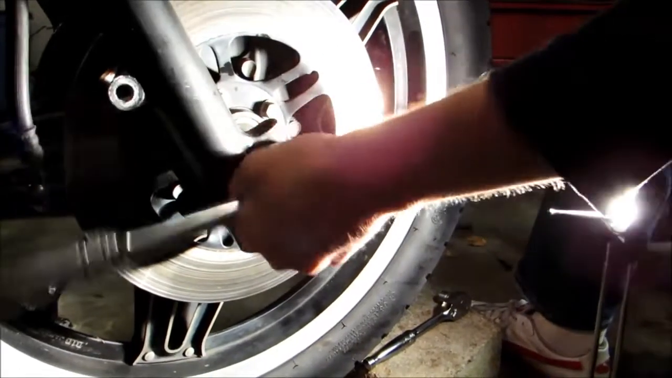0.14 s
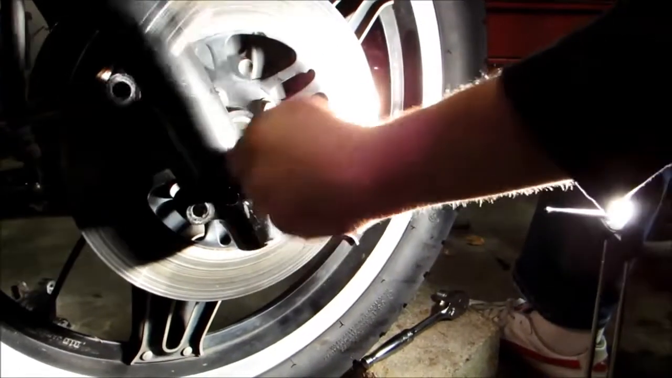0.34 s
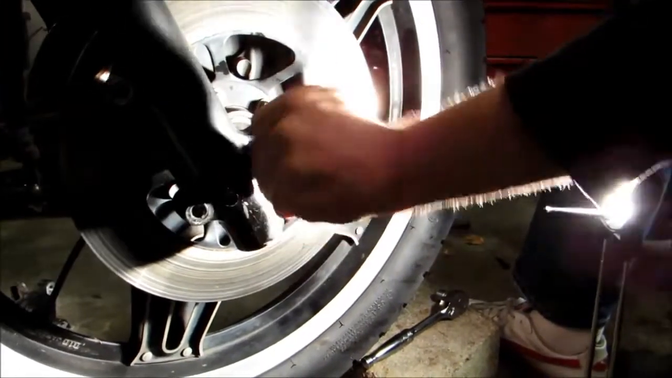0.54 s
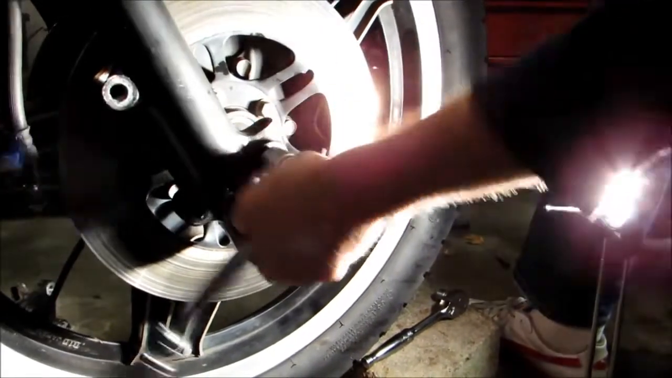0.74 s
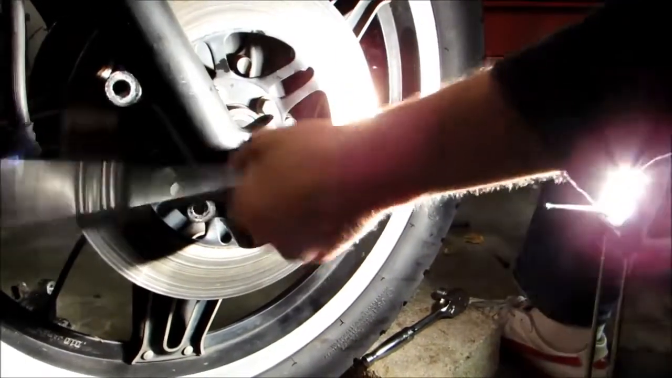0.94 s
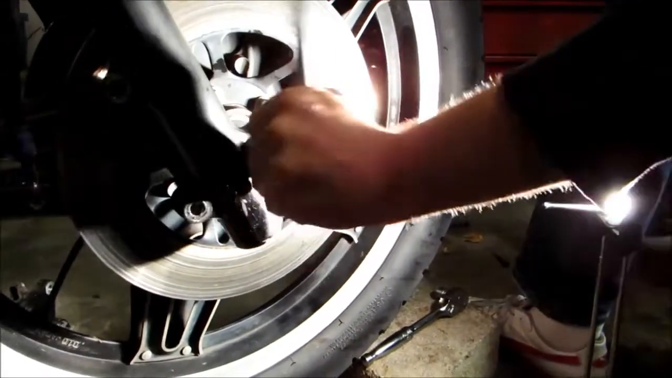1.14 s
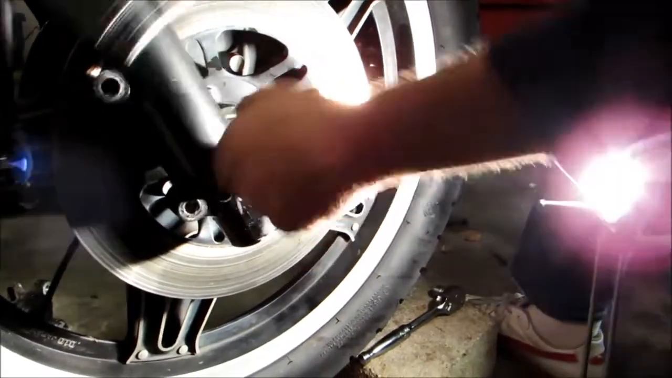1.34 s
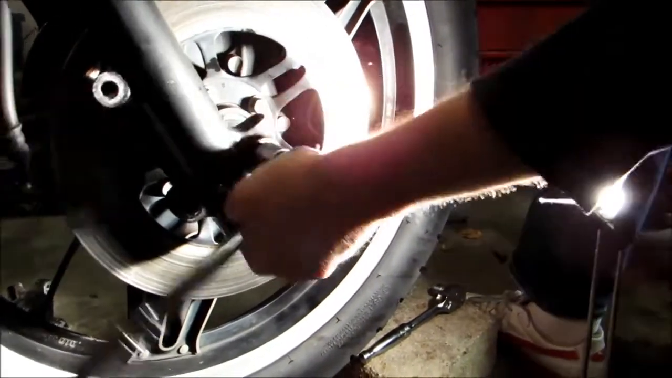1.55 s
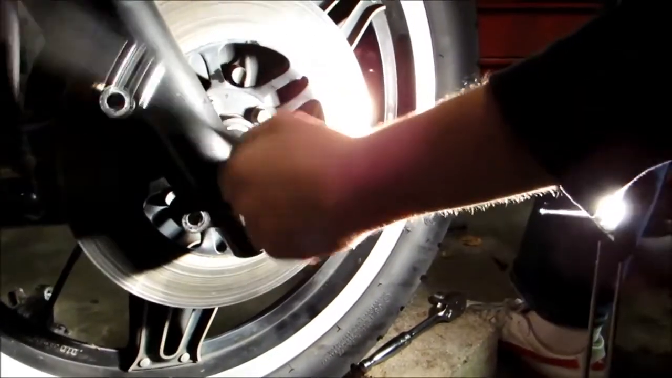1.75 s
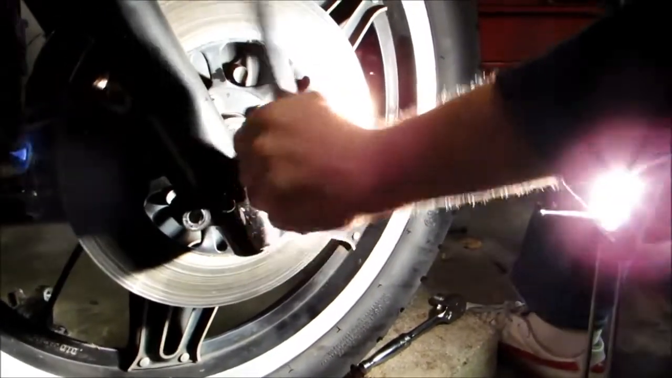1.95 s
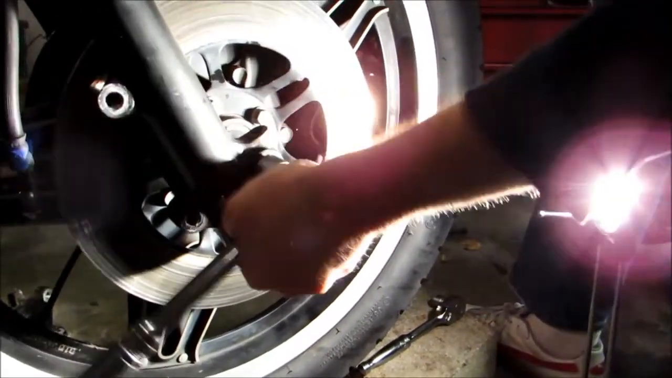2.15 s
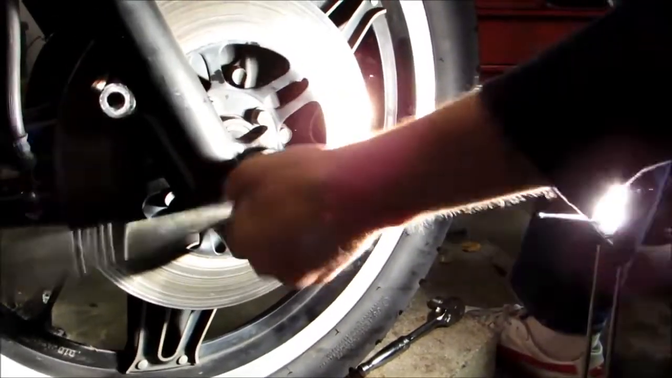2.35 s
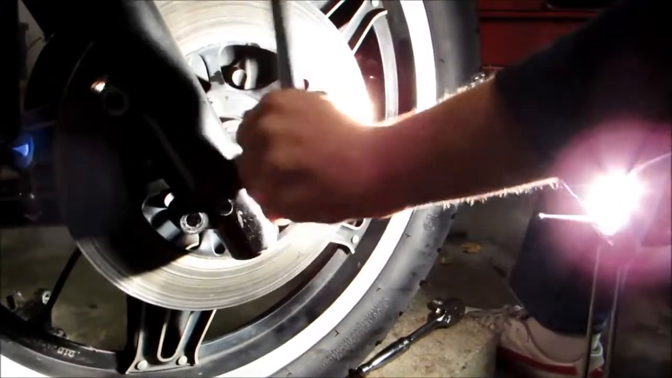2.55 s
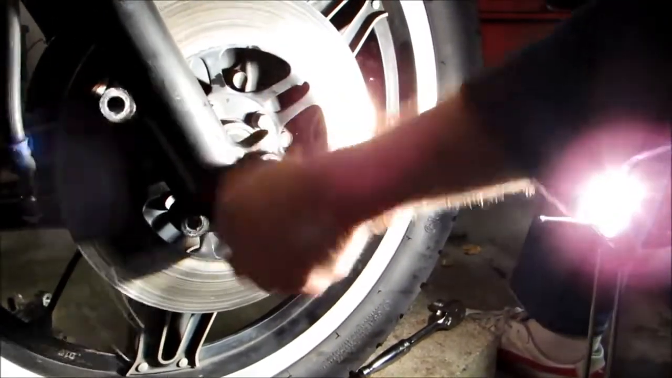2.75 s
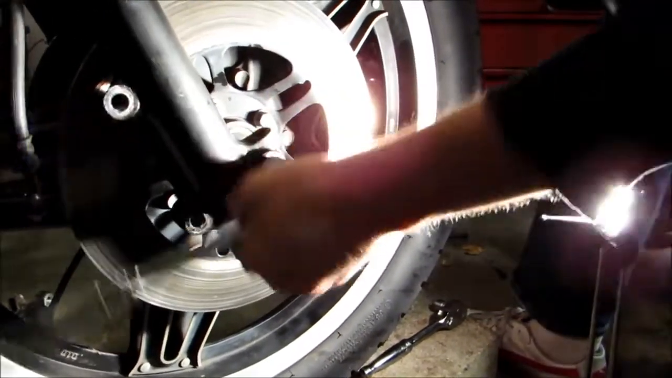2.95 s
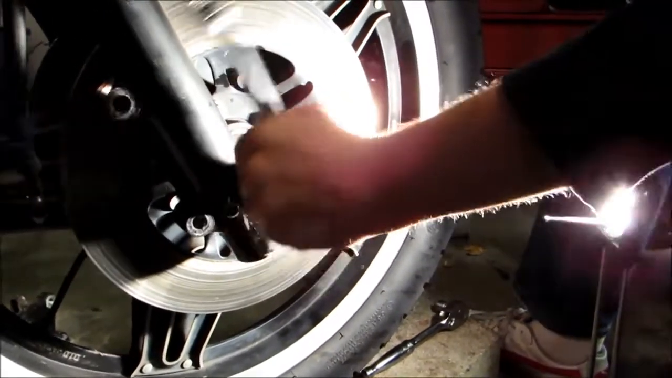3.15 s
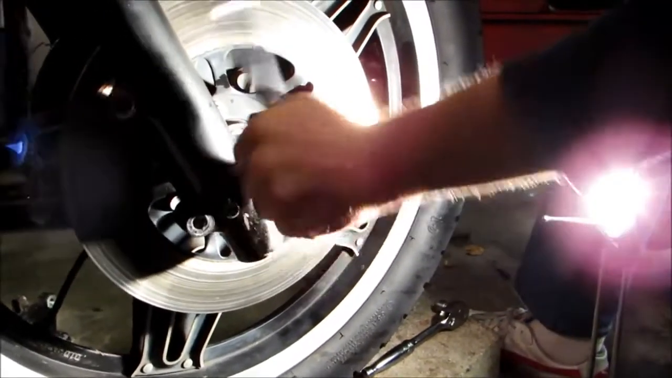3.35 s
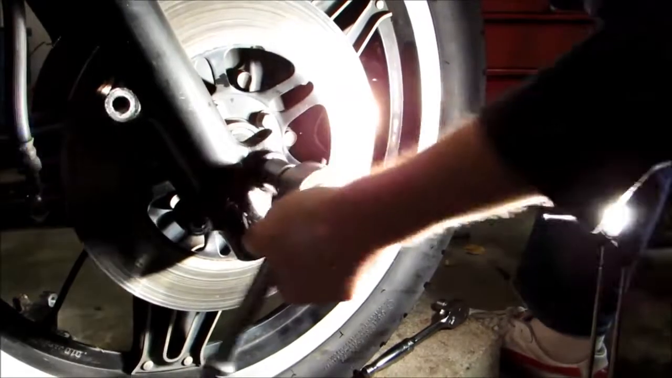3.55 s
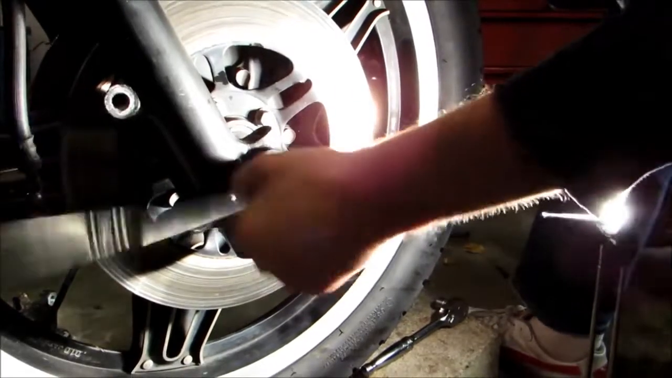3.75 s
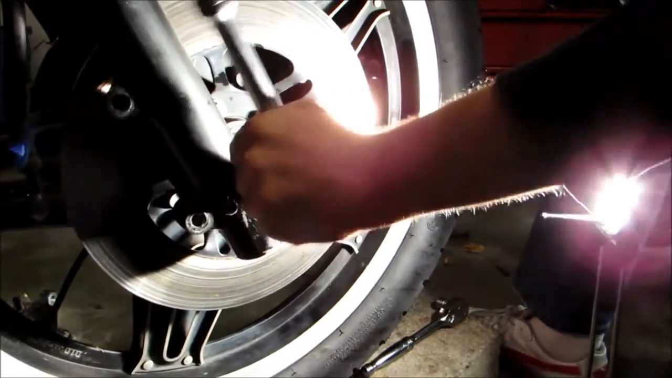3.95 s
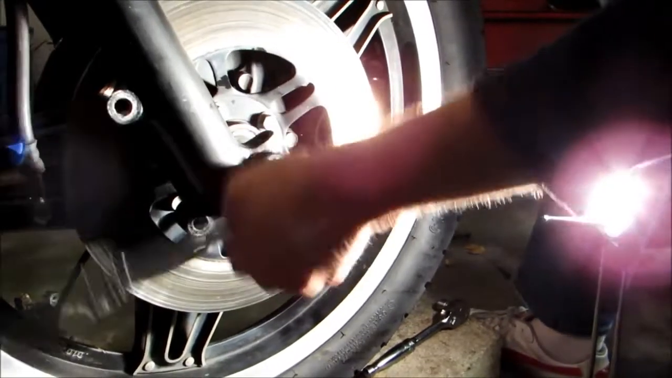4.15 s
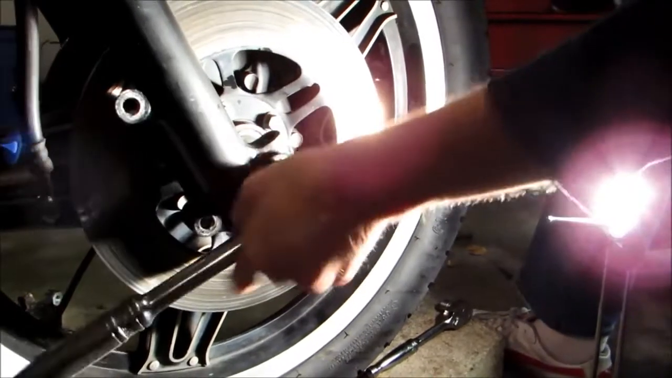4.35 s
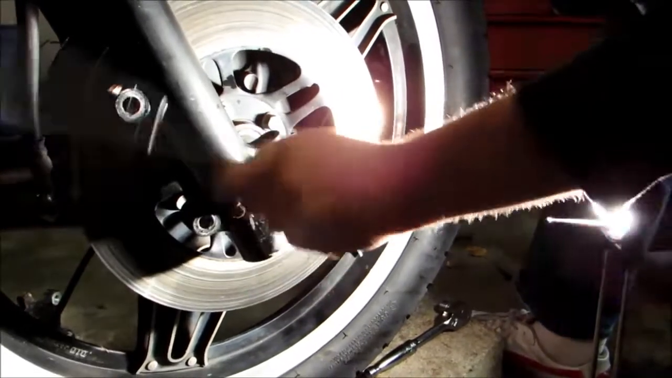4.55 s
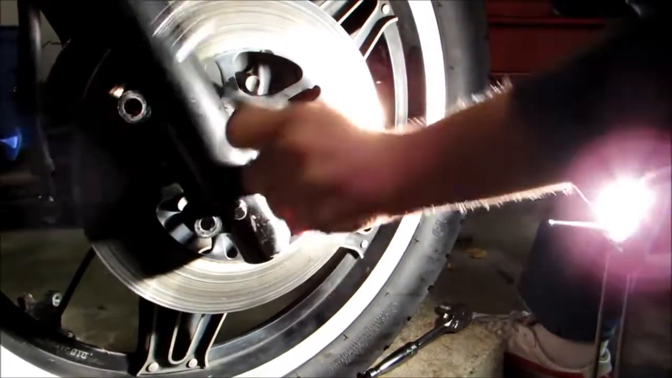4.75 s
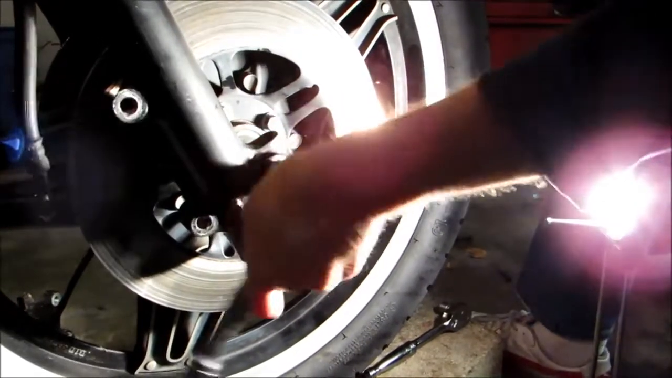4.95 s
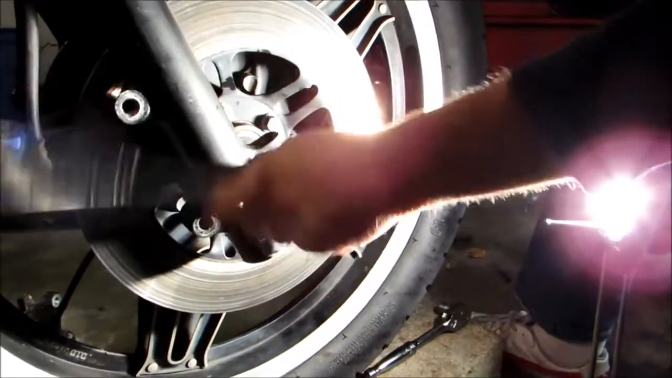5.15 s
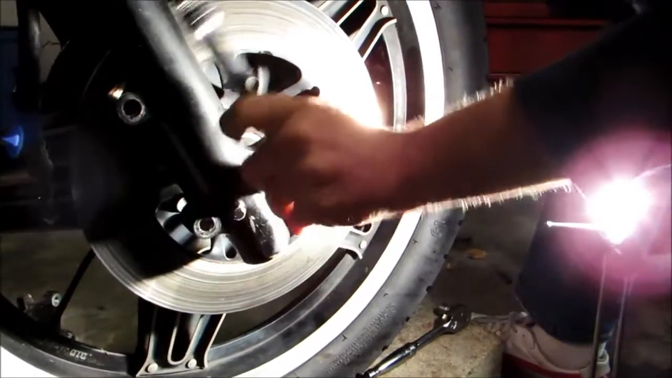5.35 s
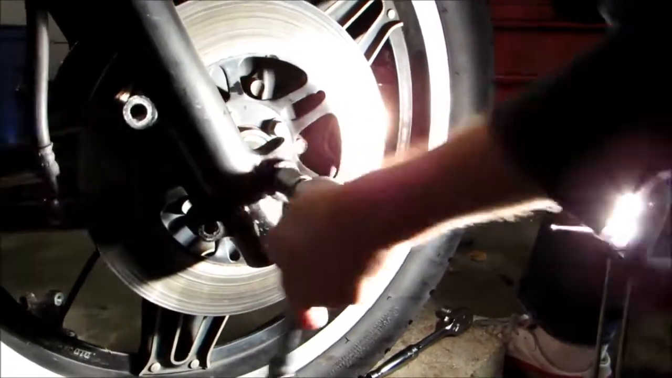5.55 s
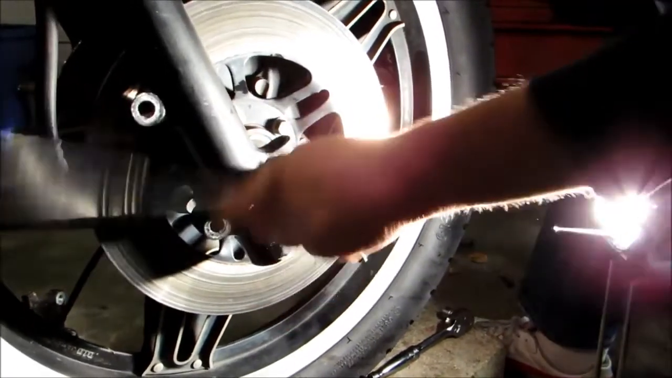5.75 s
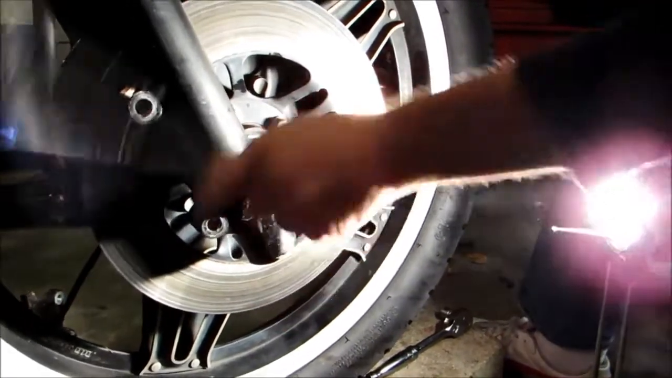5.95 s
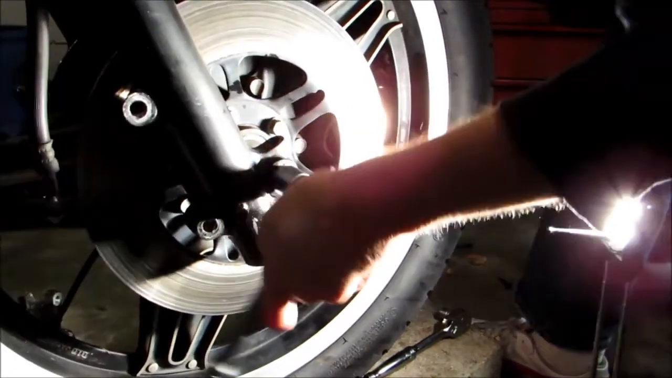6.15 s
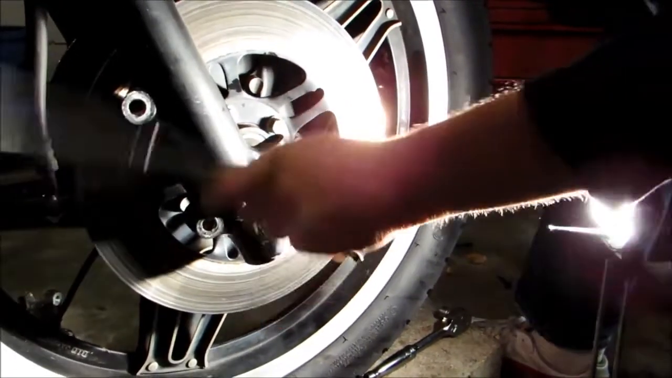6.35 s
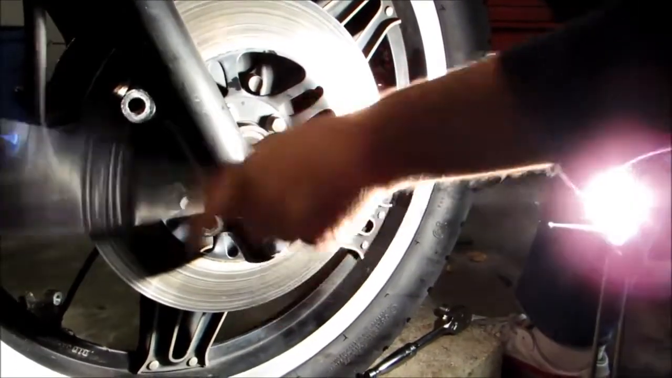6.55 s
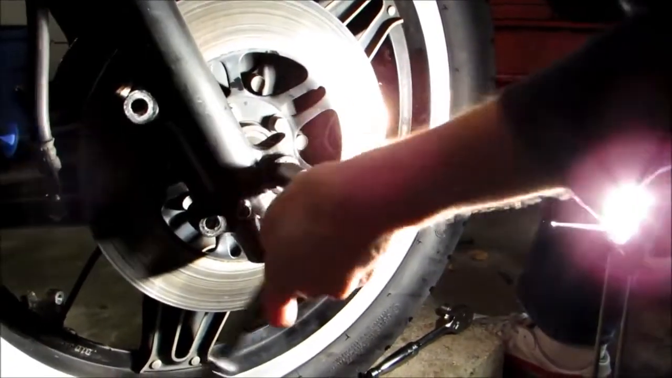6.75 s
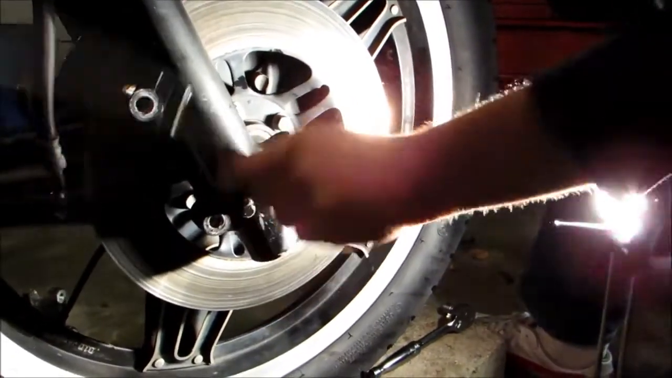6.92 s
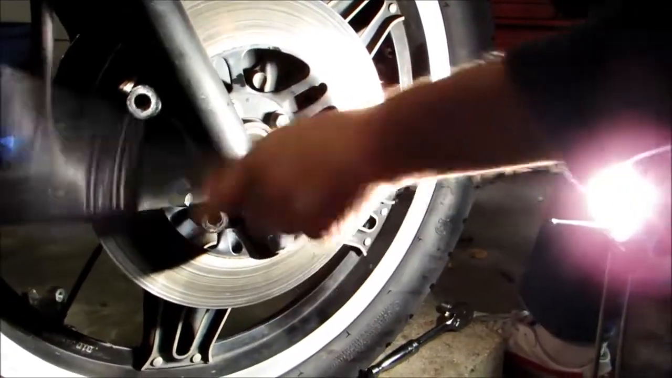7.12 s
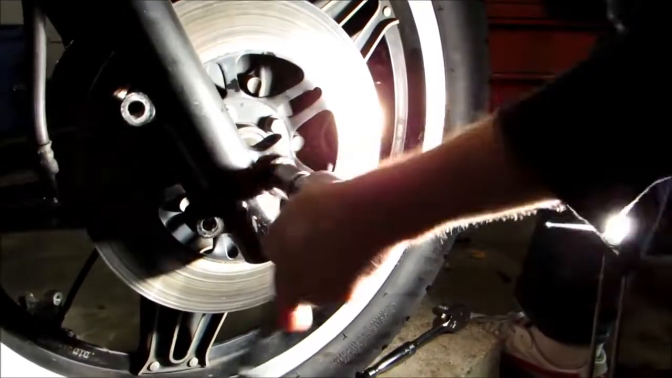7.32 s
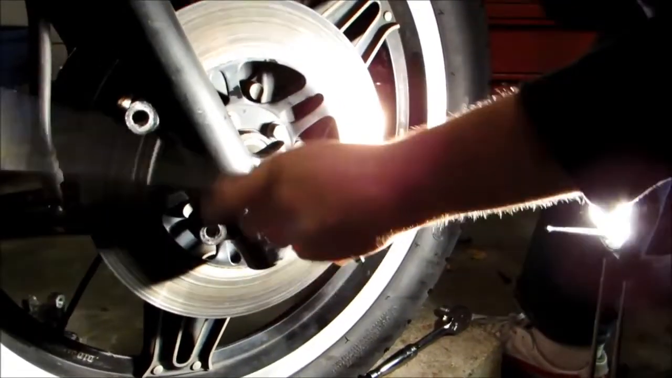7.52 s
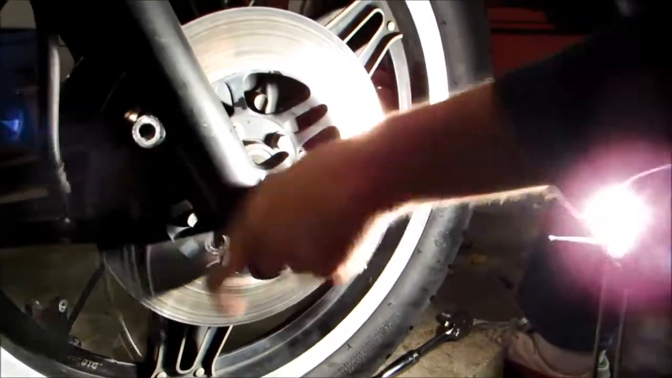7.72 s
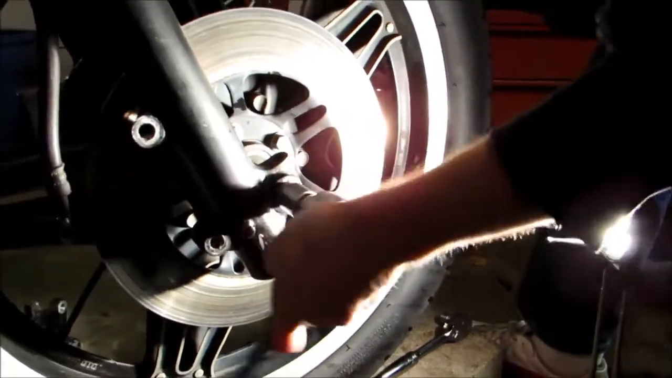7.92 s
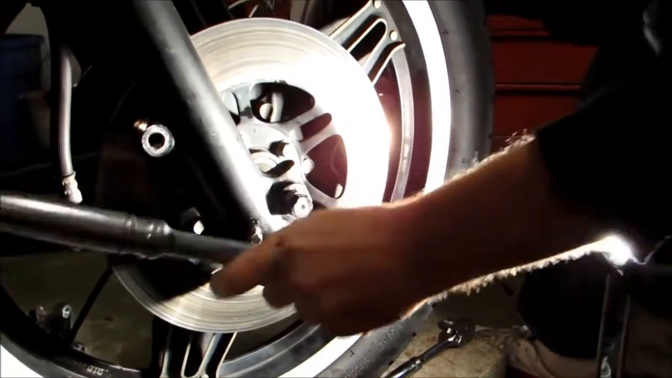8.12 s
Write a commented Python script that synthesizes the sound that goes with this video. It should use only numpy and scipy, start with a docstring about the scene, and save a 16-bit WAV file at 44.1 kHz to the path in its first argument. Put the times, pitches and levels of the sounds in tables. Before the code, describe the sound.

A socket ratchet clicks in thirteen quick bursts, with small metallic clacks between strokes, close up in a small, lively garage.

```python
"""A socket ratchet backs a bolt out of a motorcycle's front fork, close by in a small garage, for about 8 s.
The handle first knocks loosely, then the pawl (the sprung catch) snaps over the teeth in thirteen return swings.
Between swings the socket takes up its slack and clacks; from 1.7 s on, a few hollow bumps sound as well.
Toward the end the bolt rattles more. Blows are shaped noise, bumps are fading sine waves;
echoes and reverberation answer them, and a quiet rush of noise fills the room throughout."""
import sys
import numpy as np
from scipy import signal
from scipy.fft import rfft, irfft, next_fast_len
from scipy.io import wavfile
from scipy.ndimage import map_coordinates

SR = 44100
rng = np.random.default_rng(int(sys.argv[2]) if len(sys.argv) > 2 else 0)


def log_audio(samples):
    """Write samples as a 16-bit WAV file to the path given in sys.argv[1]."""
    # one column per channel
    frames = np.atleast_2d(samples).T
    # limit to full scale, then quantise
    limited = np.clip(frames, -1, 1)
    pcm = np.round(limited * 32767).astype(np.int16)
    wavfile.write(sys.argv[1], SR, pcm)


N = 365148  # length of the scene in samples
SIZE = 4096  # length of one blow in samples
T, HZ = np.arange(SIZE) / SR, np.fft.rfftfreq(SIZE, 1 / SR)


# Return swings of the handle. Each row: first tooth in seconds, last tooth in seconds, count of teeth,
# first gap and last gap as multiples of the gap at full speed, relative level at the start, in mid-swing
# and at the end in dB, brightness in dB, ring of the steel head in dB, ring at the end in dB,
# middle pitch of the snap in Hz.
RETURN_SWINGS = [(0.2856, 0.5010, 9, 1.39, 1.26, -15.5, -18.5, -16.5, 0, -2.5, -20, 3040),
                 (0.9458, 1.2473, 11, 1.6, 1.53, -17, -20, -21, 0, -6, -5, 2880),
                 (1.6649, 1.9306, 9, 1.2, 1.58, -20, -19.5, -19.5, 1, 1.5, 0, 3080),
                 (2.3929, 2.5842, 9, 1.44, 1.42, -18.5, -20, -18.5, -1, 1.5, -19, 3220),
                 (2.9847, 3.2740, 10, 1.51, 1.61, -20, -19, -22, 2, 3, -10, 3250),
                 (3.722, 3.9870, 9, 1.3, 1.5, -21, -19, -18, 1, 2, -3.5, 3090),
                 (4.5485, 4.699, 7, 1.02, 1.67, -16, -18.5, -19, 1, 7.5, -11, 3000),
                 (5.1501, 5.3342, 9, 1.18, 1.54, -17.5, -22, -17, 1.5, 5, 9, 2820),
                 (5.691, 5.9084, 11, 1.32, 1.52, -18.5, -21.5, -18.5, 2, 5.5, 0, 3030),
                 (6.2670, 6.4602, 9, 1.59, 1.68, -19.5, -19.5, -19.5, -1, 5, -2, 2500),
                 (6.861, 7.0706, 10, 1.67, 2.35, -18.5, -22, -19, 0, 4.5, 15, 2830),
                 (7.4163, 7.6180, 10, 1.38, 1.48, -20, -21, -20.5, 1, -7, 0.5, 2430),
                 (7.9868, 8.0987, 5, 1.19, 1.08, -17, -21, -26.5, 1, 3.5, 0, 3150)]


def teeth():
    """The handle gathers and loses speed near the ends of each swing, which sets the time of every tooth."""
    ease = 5  # a high power keeps the speed change within a tooth or two of each end
    first_db, first_bright_db, first_ring_db = 0.2, -2, -1.5  # the first tooth breaks free harder and duller
    pitch_rise_octaves = 0.081  # the snap rises over a swing
    # random differences from tooth to tooth
    scatter_db, bright_scatter_db, ring_scatter_db, pitch_scatter_octaves = 1.0, 2, 8, 0.16
    rows = []
    for (start, end, count, first_gap, last_gap, start_db, middle_db, end_db,
         bright_db, ring_db, end_ring_db, hz) in RETURN_SWINGS:
        count = round(count)
        step, place = np.linspace(0, 1, count - 1), np.linspace(-1, 1, count)
        gaps = 1 + (first_gap - 1) * (1 - step) ** ease + (last_gap - 1) * step ** ease
        times = start + (end - start) * np.r_[0, np.cumsum(gaps)] / gaps.sum()

        first = np.arange(count) == 0
        early, late = np.minimum(place, 0) ** 2, np.maximum(place, 0) ** 2
        size, colour, ring_change, pitch_change = rng.standard_normal((count, 4)).T
        level = middle_db + early * (start_db - middle_db) + late * (end_db - middle_db)
        level = level + first_db * first + scatter_db * size
        bright = bright_db + first_bright_db * first + bright_scatter_db * colour
        ring = ring_db + late * (end_ring_db - ring_db)
        ring = ring + first_ring_db * first + ring_scatter_db * ring_change
        pitch = hz * 2 ** (pitch_rise_octaves * place / 2 + pitch_scatter_octaves * pitch_change)
        rows += zip(times, level, bright, ring, pitch)
    return rows


# Tone colour of the snap, before the resonances. Each row: frequency in Hz, relative level in dB per Hz.
SNAP_COLOUR = [(500, -27.5), (800, -19.5), (1150, -8), (1400, -8), (1850, -3.5), (2300, -2), (3000, 0.5),
               (3550, -0.5), (4300, -1.5), (5500, -3.5), (7000, -3.5), (9000, -1.5), (11500, -4),
               (14000, -4)]
# Ringing modes of the steel head. Each row: frequency in Hz, width in Hz, relative level in dB.
HEAD_MODES = [(1140, 49, -13), (1613, 96, 7), (2820, 81, -0.5), (5080, 320, 0.5), (6044, 260, 12.5),
              (9000, 180, 1.5)]
# How far the hand slips back and frees the head. Each row: time in seconds, relative ring in dB.
HAND_GRIP = [(0, -13), (4.1, -16), (4.6, -11), (7, -9), (7.6, 2), (8.28, -11)]
# How alike left and right are for sounds of the tool. Each row: frequency in Hz, likeness (1 = the same).
TOOL_ALIKE = [(300, 0.15), (900, 1), (2500, 0.77), (5000, 0.66), (6100, 0.56), (7500, 0.34), (9500, 0.71),
              (11500, 0.13), (14000, 0.11)]


def pawl(drops):
    """Each tooth: a bouncing crack and a snap that rings the head, which sings on where the hand leaves it free."""
    level_db, ring_db, crack_db, sing_db = -1.0, -1, -4, -17
    pitch_db, pitch_width_hz = 6.0, 380  # the pawl's own resonance
    sing_hz, sing_width_hz = 5960, 260
    track = np.zeros((2, N))
    modes = sum(amp(db) ** 2 * peak(hz, width) for hz, width, db in HEAD_MODES)
    bright_tilt = along([(1500, -0.83), (3500, -0.11), (8000, 0.33)], HZ)
    # mainly the treble follows the single contacts
    crack_tilt_db = along([(1500, -17.0), (4000, -8), (8000, 4.0)], HZ)
    sing_colour = 20 * np.log10(peak(sing_hz, sing_width_hz))
    for s, db, bright_db, head_db, pitch in drops:
        # the pawl's own resonance differs in pitch from tooth to tooth, partly at random
        own = amp(pitch_db) ** 2 * peak(pitch, pitch_width_hz)
        ringing = 1 + modes * amp(ring_db + head_db) ** 2 + own
        plain = along(SNAP_COLOUR, HZ) + bright_db * bright_tilt

        snap_touch = contact(rise=0.0001, chatter=0.0012, t60=0.026)
        snap = burst(snap_touch, plain + 10 * np.log10(ringing), TOOL_ALIKE)
        crack = burst(bounces(t60=.006), plain + crack_tilt_db, TOOL_ALIKE)
        sing = burst(contact(rise=0.00089, chatter=.002, t60=0.059), sing_colour, TOOL_ALIKE)

        free_db = np.interp(s, *np.transpose(HAND_GRIP))
        blow = snap + amp(crack_db + 0.51 * bright_db) * crack + amp(sing_db + free_db) * sing
        add(track, s, amp(db + level_db) * blow)
    return track


def bounces(t60):
    """The sprung pawl lands and rebounds at uneven gaps, each contact weaker than the last on average."""
    count, spacing, loss_db, scatter_db = 3, 0.001, -3.0, 3  # spacing in seconds
    gaps = spacing * rng.uniform(.4, 1.6, count - 1)
    age = T - np.r_[0, np.cumsum(gaps)][:, None]
    size_db = loss_db * np.arange(count) + scatter_db * rng.standard_normal(count)
    contacts = (age >= 0) * amp(size_db[:, None] - 60 * np.abs(age) / t60) ** 2
    return np.sqrt(np.sum(contacts, 0))


# The bolt works loose. Each row: time in seconds, relative level of its rattle in dB.
BOLT_PLAY = [(0, -9), (1.8, -10), (3.2, -8.5), (4.6, -4), (5.3, -14), (6.3, -4), (7, -2.5), (7.5, -0.5),
             (8.28, 3.5)]
# Tone colour of the bolt's rattle. Each row: frequency in Hz, relative level in dB per Hz.
BOLT_COLOUR = [(300, -21), (600, -5.5), (950, 1.5), (1250, 1), (1600, -7), (2400, -3), (5000, -44)]
# Tone colour of the fork's dull knock. Each row: frequency in Hz, relative level in dB per Hz.
FORK_COLOUR = [(50, -26.5), (100, -11), (160, 2.5), (230, -3), (310, 7.5), (420, -8.5), (700, -4.5),
               (1200, -8), (3000, -49.5)]
# How alike left and right are for the fork and the reverberation. Each row: frequency in Hz,
# likeness (1 = the same, negative = opposed).
WIDE_ALIKE = [(100, -0.083), (300, -0.31), (900, 0.7), (3000, 0.89), (6000, 0.91), (9000, -0.14),
              (14000, -0.2)]


def drive(drops):
    """The pawl scrapes up each flank, louder in a fast swing; its drop shakes the bolt and the fork."""
    slide_db, rattle_db, knock_db = -20, -19, -22
    usual_gap, longest_gap, lead = 0.035, 0.07, .008  # seconds; the scrape starts ahead of the drop
    track = np.zeros((2, N))
    times, levels = np.transpose(drops)[:2]
    speeds = usual_gap / np.minimum(np.diff(times, prepend=0), longest_gap)
    for s, db, speed in zip(times, levels, speeds):
        slide = burst(contact(rise=0.018, chatter=lead, t60=0.0043), along(SNAP_COLOUR, HZ), TOOL_ALIKE)
        rattle = burst(contact(rise=0.0025, chatter=0.0032, t60=0.053), along(BOLT_COLOUR, HZ), TOOL_ALIKE)
        knock = burst(contact(rise=0.00063, chatter=0.0018, t60=0.092), along(FORK_COLOUR, HZ), WIDE_ALIKE)
        loose_db = np.interp(s, *np.transpose(BOLT_PLAY))
        shake = amp(rattle_db + loose_db) * speed * rattle + amp(knock_db) * knock
        add(track, s - lead, amp(db + slide_db) * speed * slide)
        add(track, s, amp(db) * shake)
    return track


# The play in the socket closes as the handle turns round. Each row: time in seconds,
# relative level of the clack in dB, relative level of the fork's knock in dB.
HANDLE_TURNS = [(0.143, -43, -37), (0.613, -17.5, -25), (0.874, -46, -36.5), (1.3374, -23.5, -36.5),
                (2.0541, -16.5, -33.5), (2.298, -29.5, -32.5), (2.6804, -21, -28.5), (2.862, -37, -38),
                (3.354, -26.5, -37), (3.4056, -18, -33), (3.627, -35.5, -37), (4.05, -24.5, -27.5),
                (4.0708, -15, -40), (4.1029, -20, -31.5), (4.4969, -28, -29), (4.808, -22.5, -31.5),
                (5.087, -32, -35), (5.4186, -21, -38), (5.996, -19.5, -34), (6.566, -22, -33.5),
                (6.8, -37, -36), (7.06, -45, -36), (7.126, -30, -37.5), (7.689, -35, -32.5),
                (7.7257, -20, -33.5), (7.932, -42, -44)]
# Tone colour of the clack. Each row: frequency in Hz, relative level in dB per Hz.
CLACK_COLOUR = [(500, -9.5), (1000, -8), (1600, 2), (2100, 3.5), (3100, 4.5), (3900, -4), (5000, -5.5),
                (6000, -2), (7000, -9), (9200, -8), (14000, -17)]


def socket():
    """The socket clacks against the bolt head; a gentle contact is duller and lasts longer."""
    level_db, usual_treble_db, stretch = -8, -10, 0.2
    # below a firm clack the treble falls faster than the level, down to a limit
    firm_db, treble_per_db, dullest_db = -16, 2.4, -34
    track = np.zeros((2, N))
    tilt = along([(1200, 0), (1700, 0.0), (3000, 0.41), (7000, 1.0)], HZ)
    for s, db, _ in HANDLE_TURNS:
        treble_db = max(treble_per_db * (db - firm_db), dullest_db)
        hard_db = treble_db - usual_treble_db
        slow = amp(-stretch * hard_db)
        touch = contact(rise=0.00027 * slow, chatter=0.00098 * slow, t60=0.029)
        clack = burst(touch, along(CLACK_COLOUR, HZ) + hard_db * tilt, TOOL_ALIKE)
        add(track, s, amp(db + level_db) * clack)
    return track


def fork():
    """The heavy fork and wheel answer a change of load with a short, dull knock."""
    level_db = -3
    track = np.zeros((2, N))
    for s, _, db in HANDLE_TURNS:
        knock = burst(contact(rise=0.0015, chatter=0.0077, t60=0.1), along(FORK_COLOUR, HZ), WIDE_ALIKE)
        add(track, s, amp(db + level_db) * knock)
    return track


# Hollow bumps. Each row: time in seconds, relative level in dB, base pitch in Hz,
# base time to fade by 60 dB in seconds.
HOLLOW_BUMPS = [(1.724, -21.5, 304, 0.13), (5.104, -35, 160, 0.12), (5.182, -21, 470, 0.035),
                (5.6338, -23, 312, 0.12), (7.147, -33, 186, 0.06), (7.154, -34, 277, 0.076)]
# Partial tones of each bump. Each row: multiple of the base pitch, relative level in dB,
# share of the base fading time.
HOLLOW_PARTIALS = [(.26, -5, 0.52), (1, 8.5, 0.92), (1.16, -14, 0.23), (1.63, 5.5, 0.46), (2.6, -3, .35)]


def bumps():
    """Soft blows on something hollow: fading partials, out of step left to right and stronger on the right."""
    side_db, rise = np.array([[-3], [3]]), 0.0034  # left and right; rise in seconds
    track, t = np.zeros((2, N)), np.arange(SR // 4) / SR
    offset = np.array([[2 * np.pi / 3], [0]])  # the left leads by a third of a cycle
    for s, db, hz, t60 in HOLLOW_BUMPS:
        ring = 0
        for ratio, level, share in HOLLOW_PARTIALS:
            fade = amp(level - 60 * t / (t60 * share))
            ring = ring + fade * np.sin(2 * np.pi * hz * ratio * t + offset)
        soft_start = 1 - np.exp(-(t / rise) ** 2)
        add(track, s, amp(db) * amp(side_db) * ring * soft_start)
    return track


# Echoes off the wheel and floor. Each row: middle delay in seconds, level in dB.
NEAR_ECHOES = [(.0052, -33), (0.0107, -16.5), (0.012, -17)]


def garage(x):
    """The reverberation's fine texture keeps changing, and the near echoes waver slightly."""
    count, size = 5, 2048  # random reverberation patterns used in turn, samples from one to the next
    turn = np.arange(N) / size
    wet = np.zeros((2, N))
    for k in range(count):
        # the sound passes from one pattern to the next at constant power
        share = np.cos(np.pi / 2 * np.minimum(np.abs((turn - k) % count - 1), 1))
        wet += signal.oaconvolve(x * share, room_tail(), axes=1)[:, :N]
    for delay, db in NEAR_ECHOES:
        path = (delay + .00015 * wobble(rate=6)) * SR
        wet += amp(db) * x[:, np.clip(np.arange(N) - path.astype(int), 0, N - 1)]
    return wet


# How long the room rings. Each row: frequency in Hz, time to fade by 60 dB in seconds.
GARAGE_FADE = [(150, 0.42), (600, 0.31), (2500, 0.43), (6000, 0.46), (9000, 0.37), (14000, 0.31)]
# Colour of the reverberation. Each row: frequency in Hz, relative strength in dB.
WALL_STRENGTH = [(150, 1.5), (1000, 3), (3000, -1.5), (6000, -3), (9000, -1), (14000, -4)]


def room_tail():
    """Reverberation is noise that builds within a few ms and dies away at a rate set by frequency."""
    wet_db, build = -5.5, 0.0034  # build in seconds
    hz, t, z = signal.stft(rng.standard_normal((2, SR // 2)), SR, nperseg=256)
    fade = amp(-60 * t / along(GARAGE_FADE, hz)[:, None])
    tail = signal.istft(z * fade, SR, nperseg=256)[1]
    growth = 1 - np.exp(-(np.arange(tail.shape[1]) / SR / build) ** 2)
    tail = spread(tail, WIDE_ALIKE) * growth
    return filtered(tail / np.linalg.norm(tail[0]), lambda f: amp(wet_db + along(WALL_STRENGTH, f)))


# Colour of the room's rush. Each row: frequency in Hz, relative level in dB per Hz.
AIR_COLOUR = [(20, -17), (35, -7.5), (55, -5), (100, -4), (160, -5.5), (300, -4.5), (500, -6.5),
              (950, -8.5), (1600, -14.5), (2600, -16.5), (4200, -22), (8700, -25), (11500, -27),
              (14000, -34)]
# How alike the rush is left and right. Each row: frequency in Hz, likeness (1 = the same, negative = opposed).
RUSH_ALIKE = [(40, -0.54), (150, -0.36), (400, -0.32), (1000, 0.24), (4000, 0.2), (12000, 0.14)]


def air():
    """The quiet rush of the room is filtered noise; its deep rumble swells unevenly."""
    level_db, waver_db, swell_db = -49, 0.4, 3
    noise = filtered(rng.standard_normal((2, N)), lambda hz: amp(along(AIR_COLOUR, hz)))
    rush = spread(noise, RUSH_ALIKE)
    rumble = filtered(rush, lambda hz: 1 / (1 + (hz / 80) ** 4))
    rush = rush - rumble + rumble * amp(swell_db * wobble(rate=12))
    return amp(level_db + waver_db * wobble(rate=10.0)) * rush / rush.std()


def contact(rise, chatter, t60):
    """Loudness of a touch: steel chatters on steel for a moment, then the hand damps it."""
    return (1 - np.exp(-T / rise)) * amp(-60 * np.maximum(T - chatter, 0) / t60)


def burst(envelope, colour_db, alike):
    """A blow into densely packed modes, made of noise; its energy is that of 7 ms at rms 1."""
    noise = spread(rng.standard_normal((2, SIZE)), alike)
    pair = irfft(rfft(noise * envelope) * causal(colour_db))
    return pair / np.sqrt(np.mean(np.sum(pair ** 2, 1)) / (.007 * SR))


def causal(db):
    """The minimum-phase response with this gain: it rings only after the blow."""
    cepstrum = irfft(np.log(np.maximum(amp(db), 1e-4)))
    fold = np.r_[1, np.full(SIZE // 2 - 1, 2), 1, np.zeros(SIZE // 2 - 1)]
    return np.exp(rfft(cepstrum * fold))


def peak(hz, width):
    """Power response of one resonance."""
    return 1 / (1 + (2 * (HZ - hz) / width) ** 2)


def spread(pair, alike):
    """Two unrelated signals become left and right with a given likeness."""
    size = pair.shape[1]
    likeness = along(alike, np.fft.rfftfreq(size, 1 / SR))
    turn = np.arccos(np.clip(likeness, -1, 1)) / 2
    mid, side = irfft(rfft(pair) * [np.cos(turn), np.sin(turn)], size)
    return np.array([mid + side, mid - side])


def wobble(rate):
    """A smooth random curve through a given number of random points a second."""
    points = rng.standard_normal(int(N * rate / SR) + 4)
    return map_coordinates(points, [np.arange(N) * rate / SR])


def amp(db):
    """Decibels to gain."""
    return 10 ** (np.asarray(db) / 20)


def along(points, hz):
    """Read (Hz, value) points on a logarithmic frequency axis."""
    f, v = np.transpose(points)
    return np.interp(np.log(hz + 1), np.log(f + 1), v)


def filtered(x, response):
    """Shape x by a response that depends on frequency."""
    m = next_fast_len(x.shape[-1] + SR // 4)
    return irfft(rfft(x, m) * response(np.fft.rfftfreq(m, 1 / SR)), m)[..., :x.shape[-1]]


def add(track, s, sound):
    """Mix a sound into the track at s seconds."""
    part = track[:, max(round(s * SR), 0):][:, :sound.shape[-1]]
    part += sound[..., :part.shape[1]]


def scene():
    """The tool sits slightly left of centre; the garage answers the tool and, more weakly, the bumps."""
    side_db, bump_room_db = np.array([[.5], [-.5]]), -9
    drops = teeth()
    tool = (pawl(drops) + drive(drops) + socket()) * amp(side_db) + fork()
    low = bumps()
    return tool + low + garage(tool + amp(bump_room_db) * low) + air()


# Dips in the microphone's response. Each row: frequency in Hz, width in Hz, depth in dB.
MICROPHONE_DIPS = [(3927, 400, -6), (8000, 710, -4.5), (1845, 260, -3)]
# Steep end of the treble. Each row: frequency in Hz, gain in dB.
TREBLE_END = [(13900, 2), (14500, -9.5), (15200, -22), (16400, -38)]


def record(dry):
    """The sound has a few dips, its highest peaks are softly limited, and its treble ends steeply."""
    top, top_hz = 0.96, 16494  # highest level before the treble filter, highest frequency in Hz

    def dips(f):
        """Sum of the dips in dB."""
        return sum(db * np.exp(-(2 * (f - hz) / width) ** 2) for hz, width, db in MICROPHONE_DIPS)

    coloured = filtered(dry, lambda f: amp(dips(f)))
    limited = coloured / (1 + (coloured / top) ** 6) ** (1 / 6)
    return filtered(limited, lambda f: amp(along(TREBLE_END, f)) * (f < top_hz))


dry = scene()
out = record(dry)
log_audio(out)
```